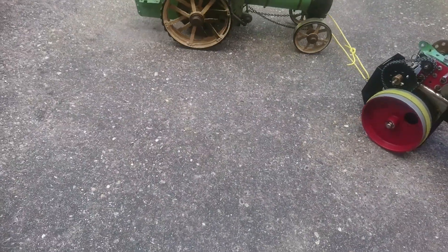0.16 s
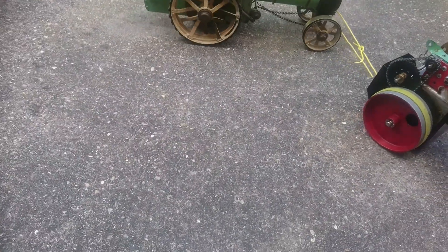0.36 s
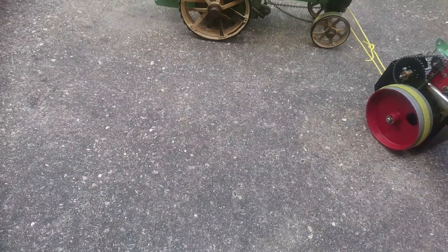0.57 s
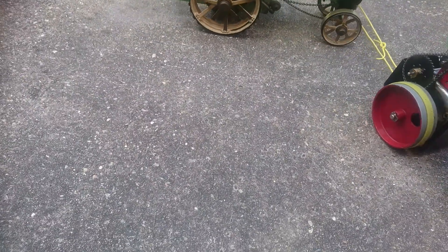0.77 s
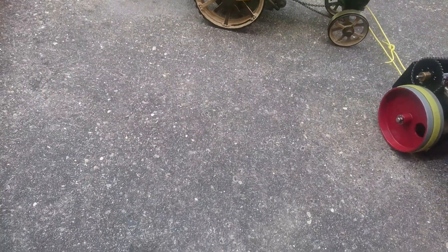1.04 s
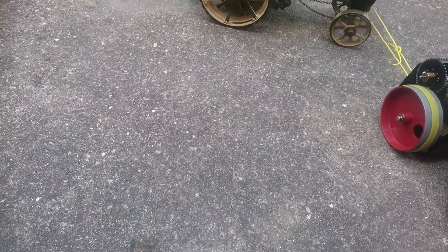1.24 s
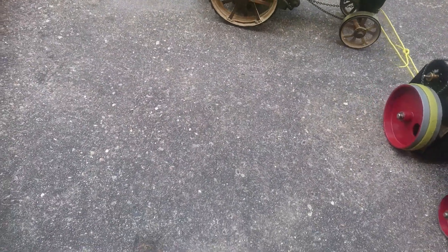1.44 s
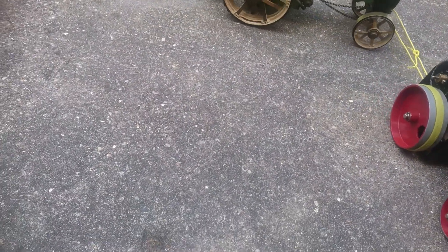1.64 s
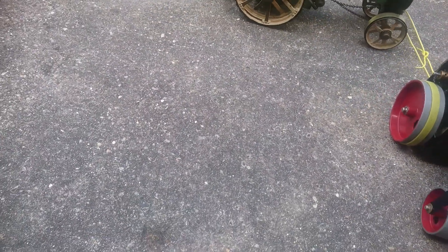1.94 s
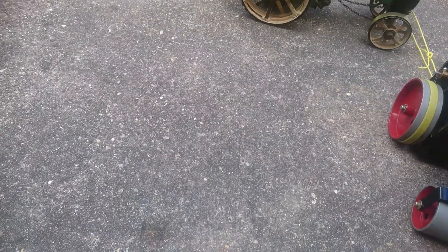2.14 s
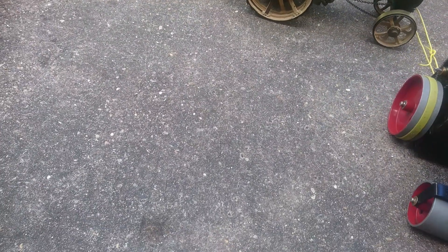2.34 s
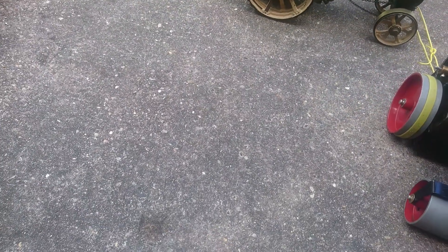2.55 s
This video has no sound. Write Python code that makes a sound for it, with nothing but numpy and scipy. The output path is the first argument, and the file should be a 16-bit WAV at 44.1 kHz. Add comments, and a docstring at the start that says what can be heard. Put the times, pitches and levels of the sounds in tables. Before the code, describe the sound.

Close stereo pickup of a toy-sized steam engine, mostly toward the right: buzzing fast puffs, dry whirring gears and hiss, repeated rasps strongest near the end, a few clinks, with soft outdoor rumble behind.

```python
"""A small live-steam model roller runs on pavement, to the right; a far motor hums over traffic rumble throughout.
From the start each shaft turn thumps and ticks while steam hiss and gear grit whirr; the shaft slows from 34 to 28
turns a second by 2 s, then gains a little. A loose part first knocks the frame at 0.02 s; a tight spot in the drive
scrapes from 0.07 s, about three times a second and hardest at 1.87 s. A loose metal part clinks first at 0.22 s,
again at 1.86 and 1.95 s. A thin far tone rises between 1.2 and 1.5 s. All are tones, noise and struck resonances."""
import sys
import numpy as np
from scipy import signal
from scipy.fft import rfft, irfft, next_fast_len
from scipy.io import wavfile
from scipy.ndimage import uniform_filter1d, map_coordinates

SR = 44100
rng = np.random.default_rng(int(sys.argv[2]) if len(sys.argv) > 2 else 0)


def unload_audio(sound):
    """Save the sound as a 16-bit wav file, at the path given as the first command line argument."""
    columns = np.transpose(np.atleast_2d(sound))
    # keep every value between -1 and 1, then stretch to whole-number steps
    steps = np.round(np.clip(columns, -1, 1) * 32767)
    wavfile.write(sys.argv[1], SR, steps.astype(np.int16))


def level_to_linear(level):
    """Convert decibel levels to linear amplitude factors, elementwise."""
    exponent = np.asarray(level, float) / 20
    return 10 ** exponent


N = 119070
TIME_S = np.arange(N) / SR

# shaft speed: time_s, speed_turns_per_s
SHAFT_SPEED = [(0.0, 33.511), (0.45, 31.501), (0.9, 30.538), (1.35, 29.412), (1.7, 28.527), (2.0, 27.835),
               (2.3, 28.378), (2.7, 28.577)]
START_TURNS = .778
# exhaust thump: shaft_multiple, peak_db
THUMP_HARMONICS = [(2, -58), (3, -52.5), (4, -51), (5, -47.5), (6, -53.5), (7, -53.5), (8, -53), (9, -59.5),
                   (10, -63.5), (11, -59), (13, -89.5)]
THUMP_PHASE_TURNS, THUMP_WAVER_DB = .476, 1
# contacts in each turn: angle_turns, resonance_hz, width_hz, rattle_s, start_db, middle_db, end_db
TURN_CONTACTS = [(0.033, 5670, 1360, 0.0024, -33.5, -35, -28.5),
                 (.0, 8730, 1200, 0.0025, -39.5, -43.5, -46), (.01, 15000, 1500, .0015, -43, -42, -46),
                 (.18, 10400, 1660, 0.0045, -38, -39.5, -40), (.42, 5104, 550, 0.0025, -40.5, -32.5, -41),
                 (.41, 11600, 1000, .004, -39, -44, -47), (.38, 15600, 1200, 0.0024, -44, -45, -42),
                 (.62, 10230, 800, 0.003, -43, -41, -38), (.77, 10000, 2000, 0.002, -38.5, -35, -38),
                 (.15, 1280, 1130, 0.0095, -36, -44, -42.5), (.41, 7100, 620, 0.0035, -47, -40, -42)]
CONTACT_SCATTER_DB, CONTACT_JITTER_S, STRIKE_GAIN = 1.2, .0002, 1.89
# whirr: time_s, level_db, low_mids_gain_db, upper_mids_gain_db
WHIRR_LEVELS = [(0, -36, 1.5, -1), (.5, -35.5, 0.5, -1), (1, -36, -1, 1), (1.5, -36, 0, 1),
                (1.9, -38, 1, 1), (2.3, -36, -2, -2), (2.7, -37, -1, -0.5)]
LOW_MIDS_HZ, UPPER_MIDS_HZ, TREBLE_HZ = 1400, 3550, 5600  # lower edges
PORT_SWELL_DB, PORT_PHASE_TURNS = 2, 0.38  # treble swell, once a turn
# hiss spectrum: frequency_hz, relative_density_db
HISS_SPECTRUM = [(180, -19), (300, -6), (723, -5), (896, -9.5), (1150, -3.5), (1580, -8), (3790, -1.5),
                 (5290, -5), (8000, -8), (10400, -9), (12500, -17), (14100, -9), (15800, -37)]
# body resonances: centre_hz, width_hz, boost_db
BODY_RESONANCES = [(528, 124, 6), (717, 10.5, 3), (1070, 120, 6), (1178, 65, 9), (2008, 36, 5),
                   (2350, 600, 6.5), (2974, 110, 3.5), (3820, 196, 7), (4180, 340, 4.5), (4550, 150, 5),
                   (5400, 300, 4), (6970, 120, 6.5), (10400, 710, 3.5), (11360, 240, 11)]
GRAINS_PER_S, GRAIN_SPREAD_DB, WHIRR_GRIT_DB = 1500, 3, -2
# far motor: time_s, fundamental_hz, rms_db
MOTOR_HUM = [(0.0, 55, -48), (0.09, 54.4, -41), (0.15, 54, -47), (0.18, 52.4, -42), (0.31, 54.5, -50),
             (0.41, 60.7, -48), (0.57, 55.6, -54.5), (1.33, 57.76, -38.5), (1.42, 57.6, -48.5),
             (1.81, 58.6, -41), (2.04, 58.2, -46), (2.26, 59.9, -42), (2.53, 59.8, -37.5),
             (2.7, 59.8, -47.5)]
HUM_SECOND_DB, HUM_WAVER_DB = -10, 1.5
# traffic spectrum: frequency_hz, relative_density_db
RUMBLE_SPECTRUM = [(30, -32), (45, -15), (60, -3), (110, 0), (200, -6.5), (400, -17), (800, -33),
                   (1500, -25.5)]
RUMBLE_RMS_DB, RUMBLE_SIDE_GAIN = -45, 0.36
# loose part strikes the frame: time_s, level_db
FRAME_KNOCKS = [(0.0243, -32), (0.2066, -39), (1.2211, -32), (1.5349, -28.5), (1.8835, -26.5), (2.008, -34)]
# frame modes: frequency_hz, relative_level_db, t60_s
FRAME_MODES = [(1167, -10.5, 0.029), (1620, -19, 0.019), (4020, 5, 0.016), (4300, -3.5, .05),
               (4900, -4.5, 0.096), (5160, -14.5, 0.1)]
# tight spot of the drive: peak_time_s, over_whirr_db
TIGHT_SPOTS = [(.07, -4), (.22, 1.5), (0.353, 4), (0.632, 3.5), (0.927, 1.5), (1.227, 3.5), (1.537, 2),
               (1.873, 7.5), (2.177, 1.5), (2.491, 2)]
SCRAPE_WIDTH_S = 0.022
# scrape spectrum: frequency_hz, relative_density_db
SCRAPE_SPECTRUM = [(410, -38), (700, -6), (851, -47), (921, -4.5), (1120, -7), (3220, -2), (3860, -3),
                   (10500, -9), (15800, -12)]
# loose metal part is struck: time_s, level_db
METAL_CLINKS = [(.2195, -35), (1.8645, -27), (1.9505, -35)]
# loose metal modes: frequency_hz, relative_level_db, t60_s
METAL_MODES = [(2417, -2, .06), (3962, -6, .03), (4689, -6, .085), (6998, 5, .11), (7192, 3, .08)]
CRACK_DB, CRACK_T60_S, MODE_SCATTER_DB = -8, .006, 1.5
# thin far tone: time_s, pitch_hz, rms_db
FAR_TONE = [(0, 728, -80), (1.2, 731, -77), (1.5, 731.3, -59), (2.7, 726, -59.5)]
# stereo likeness: frequency_hz, shared_power_fraction
LIKENESS = [(300, 0.93), (700, 0.92), (2000, 0.62), (5000, 0.4), (15000, 0.19)]
# balance at the start: frequency_hz, left_over_right_db
START_BALANCE = [(60, -0.5), (100, -1.5), (180, -10), (310, -4.0), (550, -0.5), (950, -1), (1650, -1.5),
                 (2860, -6), (4970, -2.0), (8640, -2.5), (15000, -2)]
# balance at the end: frequency_hz, left_over_right_db
END_BALANCE = [(60, -2), (100, -1.0), (180, -17), (310, -12), (550, 1.5), (950, -2.0), (1650, -2),
               (2860, -3), (4970, 3), (8640, -7), (15000, -2)]
LEFT_LAG_S = .00019
THUMP_LEFT_DB = -2.8  # right gets the opposite
OFFSET, TOP_HZ = -.0013, 15850


def unit(x):
    """Scale to rms 1."""
    return x / np.sqrt(np.mean(x ** 2) + 1e-20)


def along(points, hz):
    """Interpolate (frequency_hz, value) points on a log axis."""
    f, v = np.transpose(points)
    return np.interp(np.log(hz + 1), np.log(f + 1), v)


def curves(rows):
    """One value per sample for each column after the time."""
    s, *columns = np.transpose(rows)
    return [np.interp(TIME_S, s, column) for column in columns]


def wobble(knots_per_s):
    """Smooth random curve."""
    knots = rng.standard_normal(int(N * knots_per_s / SR) + 4)
    return map_coordinates(knots, [TIME_S * knots_per_s])


def filtered(x, response):
    """Multiply the spectrum of x by a complex response of frequency."""
    m = next_fast_len(N + 8192)
    return irfft(rfft(x, m) * response(np.fft.rfftfreq(m, 1 / SR)), m)[..., :N]


def turns():
    """Shaft angle in turns, the integral of its speed."""
    return START_TURNS + np.cumsum(curves(SHAFT_SPEED)[0]) / SR


def thump():
    """One low exhaust push each turn: a sum of multiples of the shaft speed."""
    angle = 2 * np.pi * (turns() - THUMP_PHASE_TURNS)
    return sum(level_to_linear(db + THUMP_WAVER_DB * wobble(8.27)) * np.sin(k * angle) for k, db in THUMP_HARMONICS)


def contacts():
    """Valve, rod and port ticks at fixed angles: a resonance is struck, then rattles for a moment."""
    out, angle = np.zeros(N), turns()
    for at, hz, width_hz, rattle_s, *db in TURN_CONTACTS:
        due_turns = np.arange(np.ceil(angle[0] - at), angle[-1] - at) + at
        hit_s = np.interp(due_turns, angle, TIME_S)
        hit_s = hit_s + rng.normal(0, CONTACT_JITTER_S, len(due_turns))
        gains = level_to_linear(rng.normal(0, CONTACT_SCATTER_DB, len(due_turns)))
        kicks = np.bincount(np.clip(hit_s * SR, 0, N - 1).astype(int), gains, N)
        window = np.hanning(max(int(rattle_s * SR), 8)) ** .5
        rattle = np.convolve(kicks, window)[:N] * rng.standard_normal(N)
        strike = STRIKE_GAIN * np.sqrt(SR / width_hz) * kicks

        def resonance(f):
            """Two equal resonators in series."""
            return (1j * f * width_hz / (hz * hz - f * f + 1j * f * width_hz)) ** 2

        burst = filtered(strike + rattle, resonance) * np.sqrt(SR / 4 / width_hz)
        out += level_to_linear(np.interp(TIME_S / TIME_S[-1], [0, .5, 1], db)) * burst
    return out


def grit():
    """Sparse clicks of uneven size and random sign."""
    sizes = level_to_linear(GRAIN_SPREAD_DB * rng.standard_normal(N)) * rng.choice([-1, 1], N)
    return unit(sizes * (rng.random(N) < GRAINS_PER_S / SR))


def through_body(x, spectrum):
    """Colour x by a spectrum and the body resonances, to rms 1."""
    def colour(f):
        """Spectrum plus resonance boosts."""
        boost_db = sum(db / (1 + (2 * (f - c) / w) ** 2) for c, w, db in BODY_RESONANCES)
        return level_to_linear(along(spectrum, f) + boost_db)

    return unit(filtered(x, colour))


def whirr():
    """Steam hiss and gear grit, flickering over time and frequency, in the resonances of the body."""
    z = signal.stft(rng.standard_normal(N) + level_to_linear(WHIRR_GRIT_DB) * grit(), nperseg=256)[2]
    field = uniform_filter1d(rng.standard_normal(z.shape), size=5, axis=0)
    field = uniform_filter1d(field, size=8, axis=1)
    flicker = signal.istft(z * level_to_linear(1.77 * unit(field)), nperseg=256)[1][:N]
    coloured = through_body(flicker, HISS_SPECTRUM)
    level_db, low_db, upper_db = curves(WHIRR_LEVELS)
    edges = np.array([0, LOW_MIDS_HZ, UPPER_MIDS_HZ, TREBLE_HZ, SR])[:, None]
    bands = filtered(coloured, lambda f: (f >= edges[:-1]) & (f < edges[1:]))
    port_db = PORT_SWELL_DB * np.cos(2 * np.pi * (turns() - PORT_PHASE_TURNS))
    mixed = (bands * level_to_linear([0 * TIME_S, low_db, upper_db, port_db])).sum(axis=0)
    return level_to_linear(level_db + 0.83 * wobble(12.25)) * mixed


def motor_hum():
    """A far motor's hum: an unsteady fundamental with its second multiple."""
    hz, db = curves(MOTOR_HUM)
    angle = 2 * np.pi * np.cumsum(hz) / SR
    level = np.sqrt(2) * level_to_linear(db + HUM_WAVER_DB * wobble(14))
    second = level_to_linear(HUM_SECOND_DB + 4.9 * wobble(8.61)) * np.sin(2 * angle)
    return level * (np.sin(angle) + second)


def traffic_rumble():
    """Low shaped noise: a shared part plus a part opposite on the two sides."""
    mid, side = filtered(rng.standard_normal((2, N)), lambda f: level_to_linear(along(RUMBLE_SPECTRUM, f)))
    pair = np.array([mid + RUMBLE_SIDE_GAIN * side, mid - RUMBLE_SIDE_GAIN * side])
    return level_to_linear(RUMBLE_RMS_DB) * unit(pair)


def ring(hit_s, db, modes):
    """A blow makes a noisy crack and rings decaying sine modes."""
    t = np.maximum(TIME_S - hit_s, 0)
    noise = np.diff(rng.standard_normal(N + 1))
    out = level_to_linear(db + CRACK_DB - 60 * t / CRACK_T60_S) * (t > 0) * noise
    for hz, level_db, t60_s in modes:
        mode_db = db + level_db + rng.normal(0, MODE_SCATTER_DB)
        out += level_to_linear(mode_db - 60 * t / t60_s) * np.sin(2 * np.pi * hz * t)
    return out


def knocks():
    """The loose part strikes the frame, whose short modes ring."""
    return sum(ring(s, db, FRAME_MODES) for s, db in FRAME_KNOCKS)


def scrape():
    """The tight spot swells into a gritty rasp of noise and clicks."""
    swell = sum(level_to_linear(db) * np.exp(-((TIME_S - s) / SCRAPE_WIDTH_S) ** 2) for s, db in TIGHT_SPOTS)
    rasp = through_body(rng.standard_normal(N) + 0.93 * grit(), SCRAPE_SPECTRUM)
    return level_to_linear(curves(WHIRR_LEVELS)[0]) * swell * rasp


def clinks():
    """The loose metal part is struck and rings in its own modes."""
    return sum(ring(s, db, METAL_MODES) for s, db in METAL_CLINKS)


def whine():
    """A thin far sine, unsteady in pitch and level."""
    hz, db = curves(FAR_TONE)
    angle = 2 * np.pi * np.cumsum(hz + 4 * wobble(15)) / SR
    return np.sqrt(2) * level_to_linear(db + 1.8 * wobble(9.87)) * np.sin(angle)


def placed(hits, draws):
    """Roller at the right: left lags, balance drifts; draws are one shared noise and one per side."""
    def share(f):
        """Power fraction common to both sides."""
        return np.clip(along(LIKENESS, f), 0, 1)

    shared = filtered(draws[0], lambda f: np.sqrt(share(f)))
    pair = hits + shared + filtered(draws[1:], lambda f: np.sqrt(1 - share(f)))
    side = np.array([[.5], [-.5]])

    def view(balance):
        """Apply level balance and lag, half to each side."""
        return filtered(pair, lambda f: level_to_linear(side * along(balance, f))
                        * np.exp(-2j * np.pi * f * side * LEFT_LAG_S))

    progress = TIME_S / TIME_S[-1]
    return view(START_BALANCE) * (1 - progress) + view(END_BALANCE) * progress


def scene():
    """Roller, thump and distant sounds in stereo."""
    draws = np.array([whirr() + scrape() + contacts() for _ in range(3)])
    roller = placed(knocks() + clinks(), draws)
    low = thump() * level_to_linear([[THUMP_LEFT_DB], [-THUMP_LEFT_DB]])
    return roller + low + motor_hum() + traffic_rumble() + whine()


def top_cut(x):
    """Nothing passes above the cut-off."""
    return signal.sosfilt(signal.butter(12, 15950, fs=SR, output="sos"), x)


def record(dry):
    """Band limit, then a small constant offset of the converter."""
    mix = filtered(dry, lambda f: f < TOP_HZ) + OFFSET
    return top_cut(mix)


dry = scene()
out = record(dry)
unload_audio(out)
```